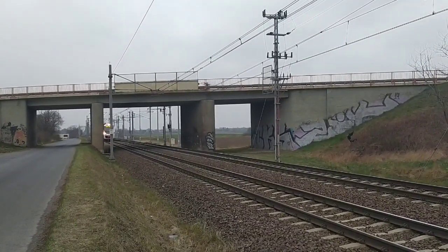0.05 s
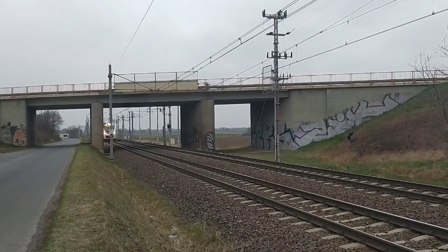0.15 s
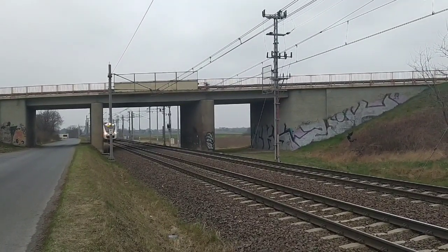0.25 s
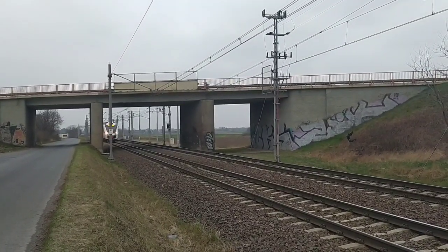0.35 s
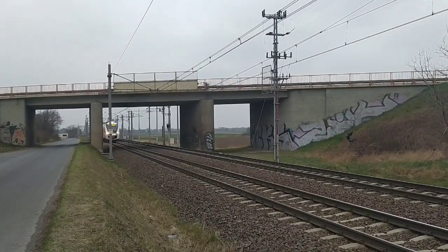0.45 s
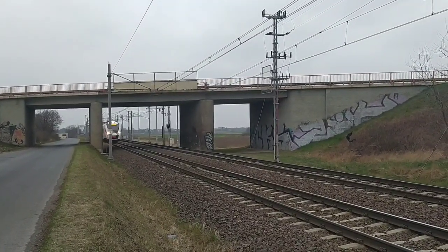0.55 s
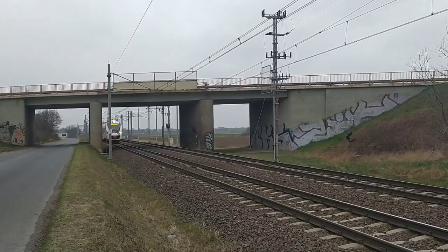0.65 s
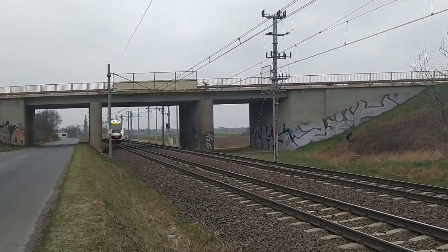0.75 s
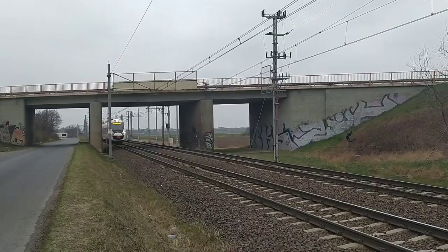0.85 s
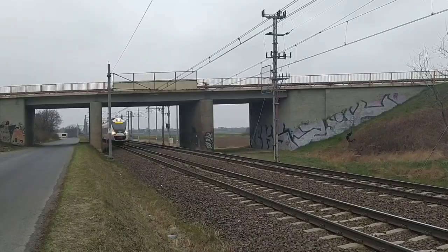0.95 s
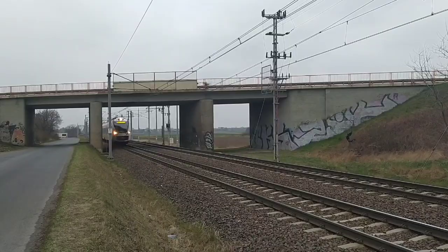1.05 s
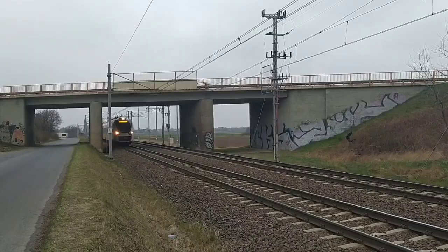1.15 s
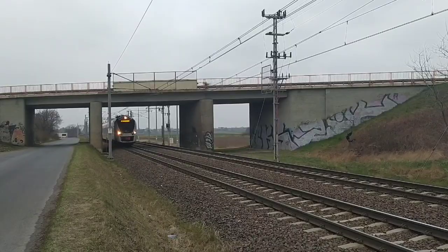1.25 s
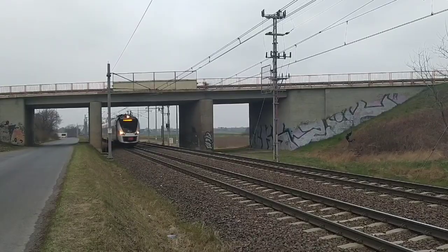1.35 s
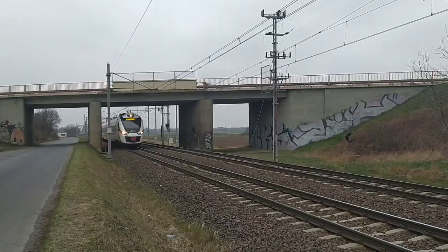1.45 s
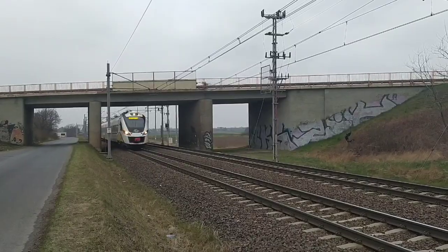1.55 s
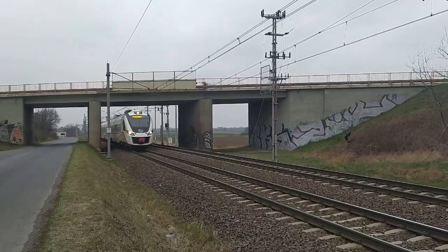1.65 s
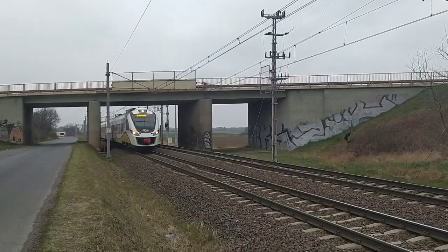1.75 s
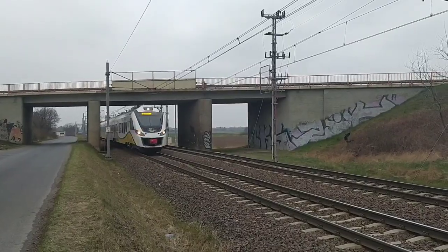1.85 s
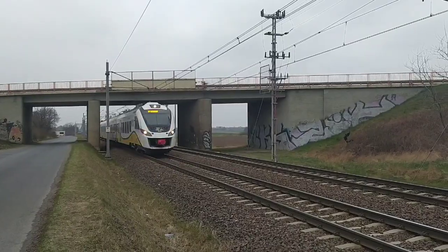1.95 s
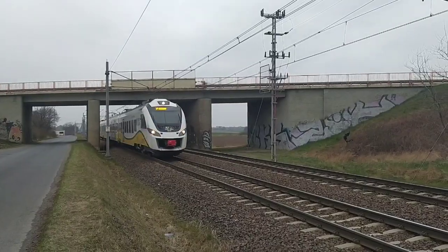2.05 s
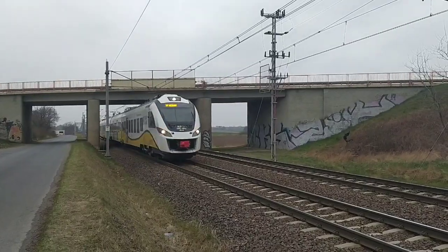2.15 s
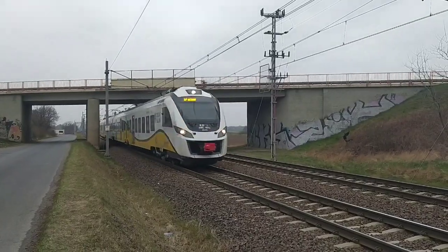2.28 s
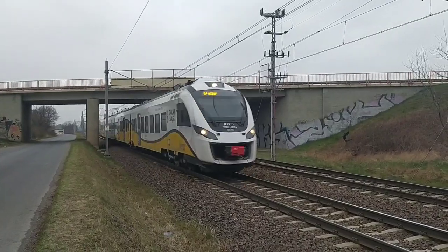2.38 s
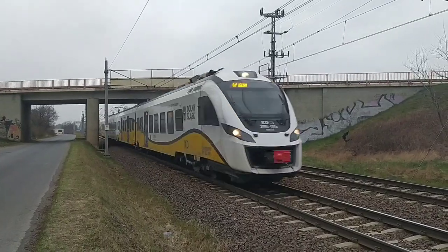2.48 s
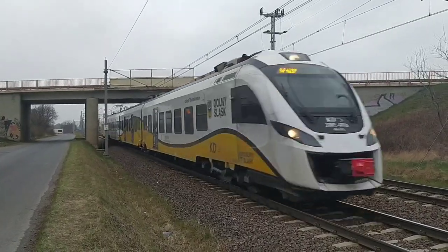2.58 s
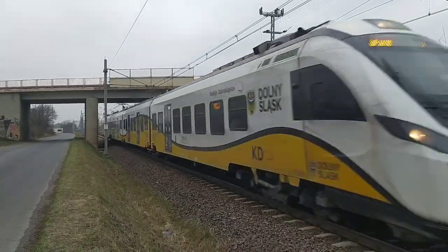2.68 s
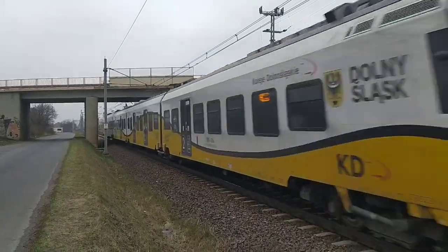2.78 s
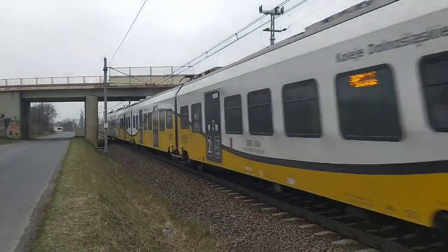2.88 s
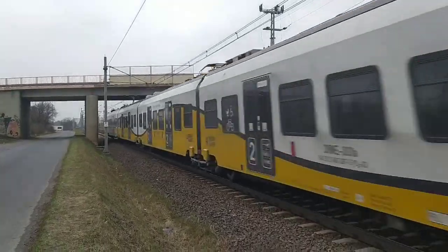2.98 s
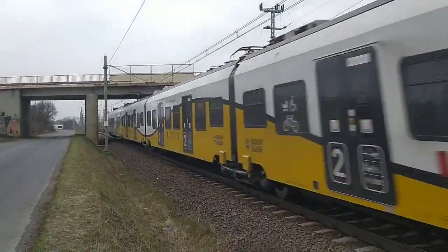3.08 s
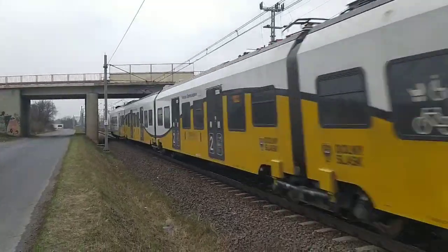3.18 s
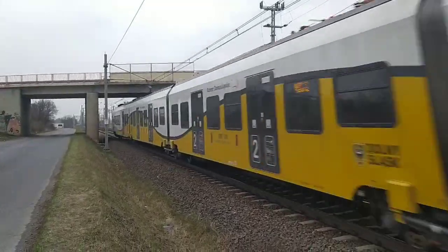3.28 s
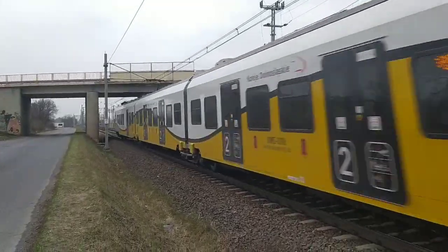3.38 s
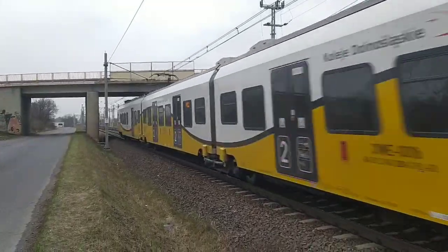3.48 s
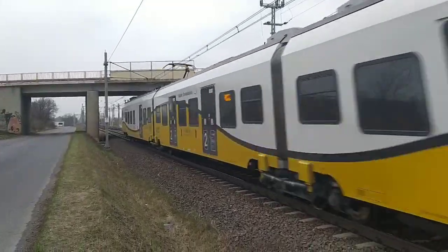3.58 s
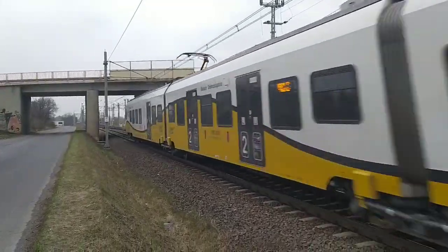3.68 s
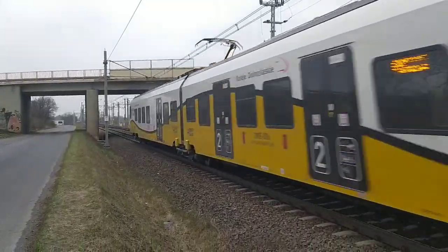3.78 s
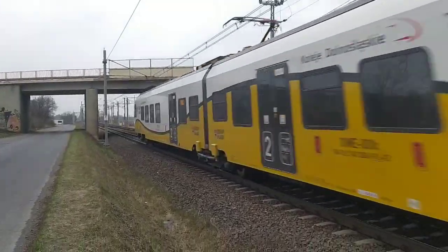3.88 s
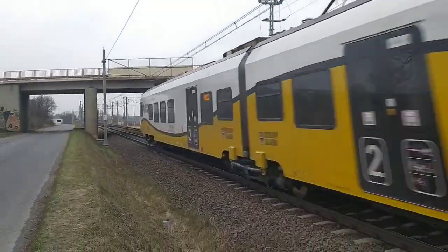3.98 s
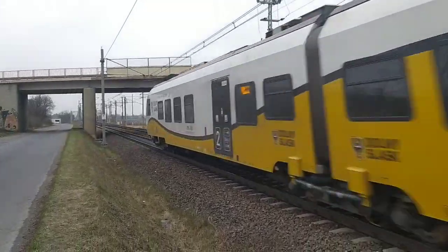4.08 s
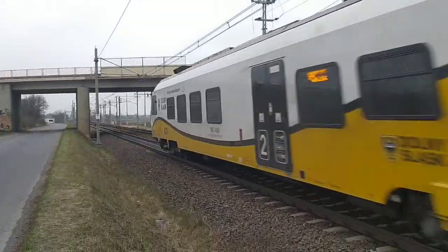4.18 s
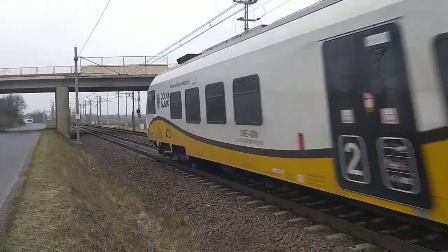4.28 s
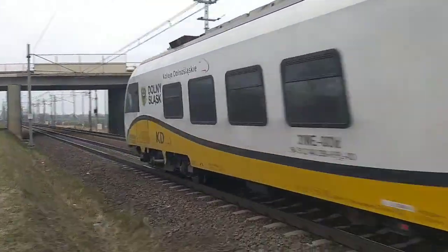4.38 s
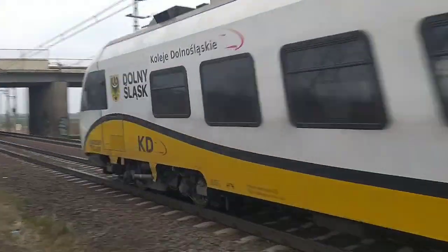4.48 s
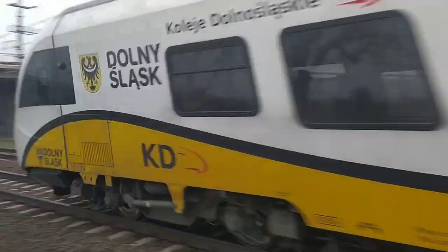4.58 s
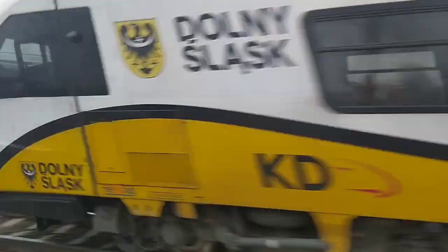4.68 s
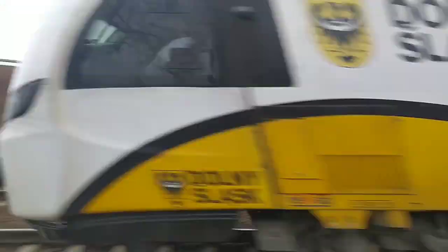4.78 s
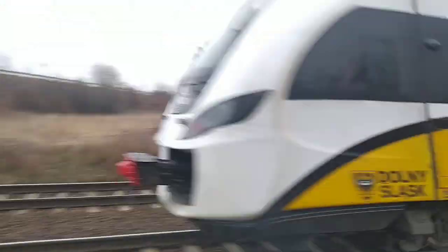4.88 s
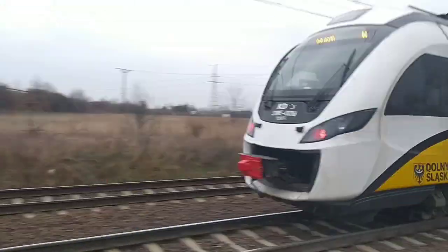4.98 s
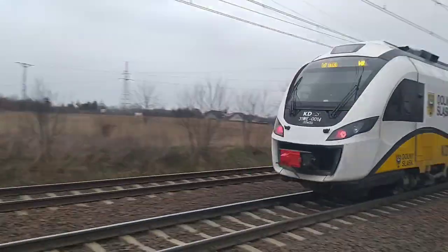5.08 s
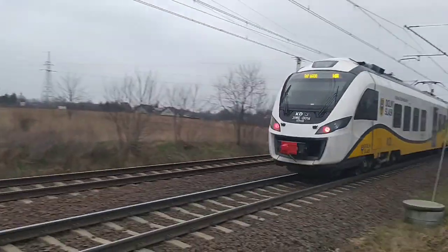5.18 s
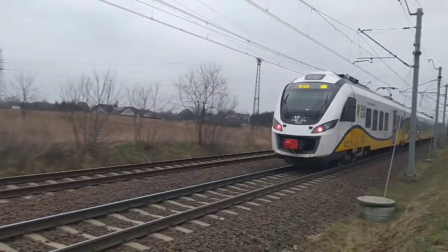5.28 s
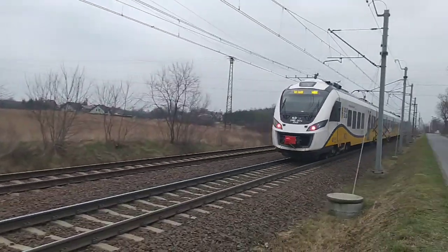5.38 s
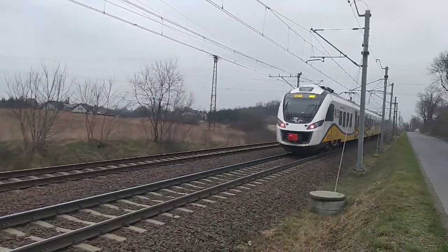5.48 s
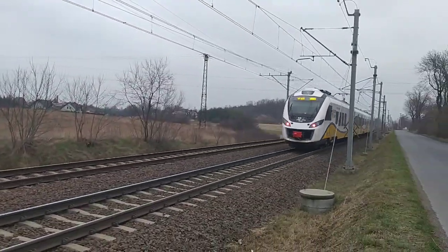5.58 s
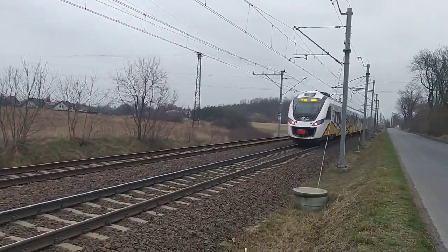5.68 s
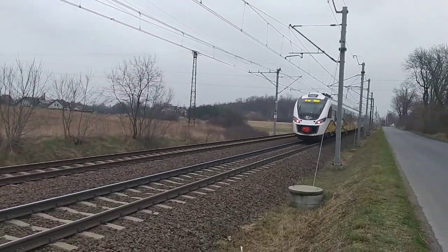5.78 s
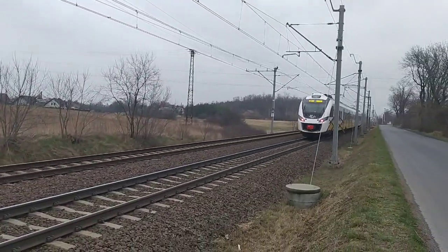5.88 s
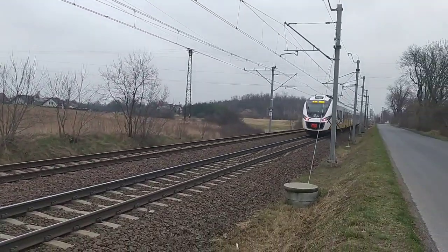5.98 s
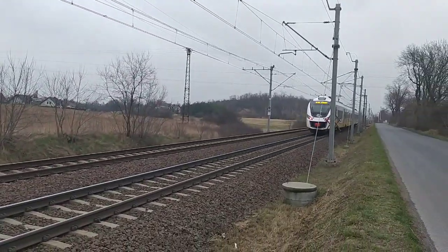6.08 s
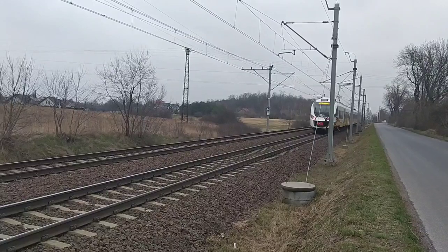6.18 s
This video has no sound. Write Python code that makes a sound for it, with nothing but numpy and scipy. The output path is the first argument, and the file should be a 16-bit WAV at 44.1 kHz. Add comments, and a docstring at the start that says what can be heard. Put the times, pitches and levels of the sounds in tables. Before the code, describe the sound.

A fast electric train passes at close range, its wheels rumbling, thumping and hissing, then fades into low, gusty wind on the microphone.

```python
"""An electric train runs under a road bridge and past at speed, a few metres from a hand-held phone.
The rails sing ahead of it and the nose shoves air aside. Then bogies rumble, uneven treads thump,
rough wheels and rails roar, and steel contact and air hiss. The ring of the last bogie falls in pitch
as it goes by, and the wake buffets the two closely spaced microphone ports."""
import sys
import numpy as np
from scipy import signal
from scipy.fft import rfft, irfft
from scipy.io import wavfile
from scipy.ndimage import uniform_filter1d, minimum_filter1d

SR = 44100
rng = np.random.default_rng(int(sys.argv[2]) if len(sys.argv) > 2 else 0)


def log_audio(samples):
    """Write samples as a 16-bit WAV file to the path given in sys.argv[1]."""
    # one column per channel
    frames = np.atleast_2d(samples).T
    # limit to full scale, then quantise
    limited = np.clip(frames, -1, 1)
    pcm = np.round(limited * 32767).astype(np.int16)
    wavfile.write(sys.argv[1], SR, pcm)


N = 275434
TIME, BIN_HZ = np.arange(N) / SR, np.arange(N // 2 + 1) * SR / N
SPEED_M_S, SOUND_M_S = 38.46, 343

# The bogies. Each row: time abreast of the microphone in seconds, low roar, rolling noise and hiss
# in relative dB, whine pitch in Hz, whine in relative dB.
BOGIES = [(2.88, 1.4, -0.53, -4, 2344, -28.5), (3.4, -2.5, 0, -3, 2235, -36),
          (3.871, -4.5, -0.8, -2.5, 2260, -47), (4.32, -1, -0.55, -1.3, 2383, -25.5),
          (4.79, -1.95, -0.5, 2, 2110, -26.5)]


def undb(db):
    """Decibels to gain."""
    return 10 ** (np.asarray(db) / 20)


def curves(table):
    """The columns of a time table, one value a sample."""
    s, *columns = np.transpose(table)
    return [np.interp(TIME, s, c) for c in columns]


def by_pitch(table):
    """The columns of a frequency table, one value a spectral bin."""
    hz, *columns = np.transpose(table)
    return [np.interp(np.log(np.maximum(BIN_HZ, 1)), np.log(hz), c) for c in columns]


def walk(rate):
    """Random levels held 1 / rate seconds and smoothed twice; spread 1."""
    hold = max(int(SR / rate), 1)
    steps = np.repeat(rng.standard_normal(N // hold + 1), hold)
    smooth = uniform_filter1d(uniform_filter1d(steps, hold), hold)[:N]
    return smooth / smooth.std()


def hump(s, width_s):
    """A smooth bell around time s, peak 1."""
    return np.exp(-np.minimum(((TIME - s) / width_s) ** 2, 50))


def swell(start, length):
    """A quick rise and slower fall, peak 1, mostly over after the given length."""
    u = np.maximum(TIME - start, 0) * 4 / length
    return (u * np.exp(1 - u)) ** 2


def pan(db):
    """Left and right gains for a level difference."""
    gains = undb(np.array([db, -db]).reshape(2, -1) / 2)
    return gains / gains.mean(axis=0)


def roar(tone):
    """Stereo noise of the given spectrum as the two ports take it in; the mid has rms 1."""
    # The microphone pair. Each row: frequency in Hz, side minus mid in dB, left minus right in dB.
    ports = [(60, -9, 2.5), (253, -10, 4.5), (420, -8, 5), (600, -8, 0.5), (900, -7.5, 5.5),
             (1210, -1.5, 0.5), (1540, 8, 0.5), (1930, -1, -4), (2340, -3.5, 0), (3100, 0, 2.5),
             (3720, 1, -3), (6000, -0.5, -3), (7040, -10.5, -2.2), (9500, -4.8, -9), (11100, -4, 2)]
    hz = np.maximum(BIN_HZ, 1)
    octaves_outside = np.abs(np.log2(hz / np.clip(hz, tone[0][0], tone[-1][0])))
    gain = undb(by_pitch(tone)[0] - 40 * octaves_outside)
    side_db, balance_db = by_pitch(ports)
    width, power_ratio = undb(side_db), undb(balance_db) ** 2
    # the part of the side that is in step with the mid leans the sound to one port
    lean = np.clip((power_ratio - 1) / (power_ratio + 1) * (1 + width ** 2) / (2 * width), -1, 1)
    common, diffuse = rfft(rng.standard_normal((2, N))) * gain
    mid = irfft(common, N)
    side = irfft(width * (lean * common + np.sqrt(1 - lean ** 2) * diffuse), N)
    return np.array([mid + side, mid - side]) / mid.std()


def resonance(hz, width_hz):
    """A mode shaken by random roughness; its centre may glide. Rms 1."""
    lowpass = signal.butter(2, width_hz / 2, fs=SR, output="sos")
    real, imag = signal.sosfilt(lowpass, rng.standard_normal((2, N)))
    phase = 2 * np.pi * np.cumsum(hz * np.ones(N)) / SR
    mode = real * np.cos(phase) + imag * np.sin(phase)
    return mode / mode.std()


def blow(noise, s, length, db):
    """One short burst of a ringing part, with a set strength."""
    first = int(s * SR)
    u = np.arange(min(int(3 * length * SR), N - first)) / SR * 4 / length
    shape = (u * np.exp(1 - u)) ** 2
    burst = noise[:, first:first + len(u)] * shape
    burst = burst * undb(db) * np.sqrt(np.sum(shape ** 2) / np.sum(burst.mean(axis=0) ** 2))
    return np.pad(burst, ((0, 0), (first, N - first - len(u))))


def along(s):
    """Metres travelled since being abreast of the microphone at time s; negative while approaching."""
    return SPEED_M_S * (TIME - s)


def distance():
    """Metres of track to the nearer end of the train, 0 while it is alongside."""
    return np.maximum(-along(BOGIES[0][0]), 0) + np.maximum(along(BOGIES[-1][0]), 0)


def nearness(near_m=15):
    """Close to 0 while the train is far, close to 1 while it is alongside."""
    return 0.067 + 0.86 / (1 + (distance() / near_m) ** 3)


def passed():
    """Share of the train that has gone by, 0 to 1."""
    return curves([(BOGIES[0][0], 0), (BOGIES[-1][0], 1)])[0]


def doppler(s, glide_m):
    """Pitch ratio of a source abreast at time s; it falls mostly within glide_m either side."""
    metres = along(s)
    return 1 / (1 + SPEED_M_S / SOUND_M_S * metres / np.hypot(metres, glide_m))


def falloff(s, reach_m, ahead_db, behind_db):
    """Level in dB of a source abreast at time s; it loses ahead_db or behind_db per tenfold distance."""
    metres = along(s)
    return -np.where(metres < 0, ahead_db, behind_db) * np.log10(np.hypot(metres, reach_m) / reach_m)


def passing(column, db, reach_m, ahead_db, behind_db, air_m):
    """Level in dB of one noise summed over the bogies; the air fades it by 1/e every air_m."""
    k = ("s", "roar", "rolling", "hiss").index(column)
    power = 0
    for bogie in BOGIES:
        gain = undb(bogie[k] + falloff(bogie[0], reach_m, ahead_db, behind_db))
        power += (gain * np.exp(-np.abs(along(bogie[0])) / air_m)) ** 2
    return db + 10 * np.log10(power)


def swells_db(column):
    """One part of the noise swells and dips briefly."""
    # Each row: peak time and half width in seconds, then rumble, rails and treble in dB.
    swells = [(1.0, 0.5, 2.5, 1.5, 2.1), (1.65, 0.36, 3, 1, 3), (2.3, 0.31, 2.5, 3.3, 1.5),
              (2.72, 0.11, -2, 5.5, 0), (2.835, 0.042, 7, 2.5, 0.5), (3.14, 0.073, 5, -4.5, -4),
              (4.08, 0.1, -3, 0.5, -0.5), (6.06, 0.037, 4, 4, -4)]
    k = ("s", "width", "rumble", "rails", "treble").index(column)
    return sum(row[k] * hump(row[0], row[1]) for row in swells)


def approach(ahead, near, behind):
    """Sound grazing the ballast loses its middle; close by it is whole; it leaves in another colour."""
    share, gone = nearness(), passed()
    far = np.sqrt(1 - gone) * roar(ahead) + np.sqrt(gone) * roar(behind)
    return np.sqrt(1 - share) * far + np.sqrt(share) * roar(near)


def ripple(sound, depth_db, size=2048):
    """Neighbouring pitches of the rail and wheel noise waver separately, at random."""
    spectra = signal.stft(sound, nperseg=size)[2]
    field = rng.standard_normal(spectra.shape[1:])
    for _ in range(2):
        field = uniform_filter1d(uniform_filter1d(field, size=3, axis=0), size=5, axis=1)
    gain = undb(depth_db * field / field.std())
    return signal.istft(spectra * gain / np.sqrt(np.mean(gain ** 2)), nperseg=size)[1][:, :N]


def bearing(sound):
    """From far along the line, the train's low roar reaches the right port first."""
    # Each row: frequency in Hz, lag of the left port in radians.
    far_lag = [(170, 0.47), (500, 0.83), (850, 0.72), (1100, 0)]
    lag, = by_pitch(far_lag)
    oblique = irfft(rfft(sound) * np.exp(.5j * np.array([-lag, lag])), N)
    share = nearness()
    return share * sound + (1 - share) * oblique


def buffets(port_hz=190, knee_hz=420, slope=2.9, rise_s=0.006, boom_hz=300, boom_width_hz=70, boom_db=4):
    """Each eddy strikes one microphone port with turbulent pressure; harder ones tend to reach higher."""
    # Each row: start and length in seconds, level in dB, upper edge in Hz, port (0 left, 1 right).
    eddies = [(0.021, 0.047, -34.5, 292, 1), (0.323, 0.05, -40, 220, 0), (0.572, 0.025, -34, 220, 0),
              (0.637, 0.036, -26.5, 252, 1), (1.101, 0.14, -33.5, 278, 1), (5.594, 0.01, -13, 398, 1),
              (5.626, 0.0077, -7, 746, 1), (5.633, 0.023, -12.5, 207, 1), (5.756, 0.052, -22, 90, 0),
              (5.905, 0.0081, -3, 685, 1), (5.964, 0.01, -2, 475, 1), (5.982, 0.021, -8.5, 1100, 1),
              (5.997, 0.0041, 2.5, 3280, 1), (6.011, 0.011, -9, 1710, 1), (6.025, 0.022, -17, 900, 1),
              (6.043, 0.01, -10, 1100, 1), (6.058, 0.048, -15, 260, 0), (6.124, 0.018, -10.5, 700, 1),
              (6.19, 0.014, -7.5, 480, 1), (6.219, 0.03, -9.5, 704, 1)]
    turbulence = rfft(rng.standard_normal(N)) * BIN_HZ ** 2 / (BIN_HZ ** 2 + port_hz ** 2)
    turbulence /= np.sqrt(1 + (BIN_HZ / knee_hz) ** 2)
    turbulence *= undb(boom_db / (1 + ((BIN_HZ - boom_hz) / boom_width_hz) ** 2))
    out = np.zeros((2, N))
    for s, length, db, edge_hz, port in eddies:
        shape = np.clip((TIME - s) / rise_s, 0, 1) ** 2 * hump(s, length)
        burst = shape * irfft(turbulence / np.sqrt(1 + (BIN_HZ / edge_hz) ** (2 * slope)), N)
        out[port] += undb(db) * burst * np.sqrt(np.sum(shape ** 2) / (np.sum(burst ** 2) + 1e-18))
    return out


def wake(full_s=6.12, rise_db_per_s=35, full_db=-23):
    """Air dragged behind the train builds up, then holds, rumbling on each port separately."""
    # Each row: frequency in Hz, relative level in dB.
    tone = [(8, 0), (22, 11.5), (60, -4), (110, 1.5), (250, -11), (500, -11), (1500, -58), (6000, -120)]
    air = irfft(rfft(rng.standard_normal((2, N))) * undb(by_pitch(tone)[0]), N)
    build_db = rise_db_per_s * np.minimum(TIME - full_s, 0)
    return air / air.std() * undb(full_db + build_db + 1.8 * walk(25))


def rail_song(fade_m=87, behind_db=-2.5):
    """The rails carry a few narrow bands far along the line and ring on behind the train."""
    # High waves running in the rails. Each row: frequency in Hz, relative level in dB.
    song_tone = [(5500, -26), (5850, 3), (6050, -34), (6400, -33), (6600, 7.5), (6850, 12), (7250, 5.5),
                 (7650, 3), (7850, -21), (8200, -18), (8600, -10), (9300, 9), (9480, 1), (9620, 9.5),
                 (9780, -2), (10000, -15), (10500, -6), (11100, -8), (12000, -19)]
    # The rail's resonance between sleepers. Each row: time in seconds, level in dB.
    span_levels = [(0, -51), (1.5, -44), (2.5, -42), (4.7, -54), (5.2, -31.5), (5.8, -34.5), (6.25, -37)]
    song = roar(song_tone) * np.exp(-distance() / fade_m)
    song *= undb(-38 + behind_db * passed() + 1.3 * walk(4.6))
    span = np.array([resonance(1305, width_hz=166), resonance(1290, width_hz=220)])
    leftward_db, = curves([(2, 0), (5, 16)])
    trail = resonance(964, width_hz=170) * pan(10) * undb(-31) * hump(5.12, width_s=0.4)
    return song + trail + span * pan(leftward_db) * undb(curves(span_levels)[0])


def bow_wave():
    """The nose drives a deep wave of air ahead of it."""
    # Each row: frequency in Hz, relative level in dB.
    tone = [(20, 6), (28, 8), (42, 0), (60, 5), (100, 1), (150, 2), (220, -8)]
    return roar(tone) * undb(-23.5) * hump(2.78, width_s=0.29)


def shoves():
    """Air pushed aside by the nose, the gaps between cars and the tail arrives in low shoves."""
    # Each row: start and length in seconds, level in dB.
    pushes = [(2.761, 0.077, -16), (3.407, 0.085, -20), (4.13, 0.1, -21), (4.245, 0.17, -20.5),
              (4.99, 0.42, -29)]
    push = sum(undb(db) * swell(s, length) for s, length, db in pushes)
    return roar([(20, -13), (50, -10), (95, -6), (175, 9.5), (290, 5), (450, -18)]) * push


def hiss():
    """Steel contact and rushing air hiss; the flanges scrape twice."""
    # The hiss and the sizzle above it. Each row: frequency in Hz, relative level in dB.
    hiss_tone = [(2900, -17), (3700, -5), (4400, 0), (5200, 3), (6000, 3.5), (7000, 3), (7700, 2),
                 (8800, -42)]
    sizzle_tone = [(6000, -32), (7200, -4), (8000, 0.5), (8750, 5), (9400, 1), (10200, -7.5), (11000, -16),
                   (12000, -21.5), (14500, -42)]
    # Each row: start and length in seconds, relative level in dB.
    scrapes = [(2.858, 0.049, -24), (2.94, 0.034, -22)]
    flutter_db = 0.95 * walk(70) + swells_db("treble")
    scrape = sum(undb(db) * swell(s, length) for s, length, db in scrapes)
    hiss_db = passing("hiss", db=-23.5, reach_m=8.5, ahead_db=23, behind_db=24.5, air_m=66.5)
    sizzle_db = passing("hiss", db=-22, reach_m=8, ahead_db=19, behind_db=15, air_m=66.5)
    low = roar(hiss_tone) * (undb(hiss_db + flutter_db) + 0.11 * scrape)
    high = roar(sizzle_tone) * pan(-0.47) * (undb(sizzle_db + flutter_db) + 0.72 * scrape)
    return low + high


def wheel_modes(ring_s=4.68):
    """Wheel modes whine and slide down as each bogie passes; the last one also rings lower."""
    # The last bogie's close modes. Each row: frequency and width in Hz, level in dB.
    modes = [(994, 103, -20), (1067, 47, -21)]
    glide = doppler(ring_s, glide_m=22)
    ring = sum(undb(db) * resonance(hz * glide, width_hz) for hz, width_hz, db in modes)
    ring_db = falloff(ring_s, reach_m=6.5, ahead_db=44, behind_db=36) - walk(45)
    out = ring * pan(9.5) * undb(ring_db)
    for s, _, _, _, whine_hz, whine_db in BOGIES:
        hz = whine_hz * doppler(s, glide_m=6)
        shared = resonance(hz, width_hz=390)
        whine = np.array([0.9 * shared + 1.15 * resonance(hz, width_hz=190) for _ in range(2)])
        out += whine * undb(whine_db + falloff(s, reach_m=6.6, ahead_db=57, behind_db=39.6))
    return out


def thumps():
    """The leading wheels clatter: each blow of an uneven tread thuds in the bogie and clangs in the rail."""
    # Each row: start and length in seconds, thud in dB, clang in dB.
    blows = [(2.401, 0.013, -31, -15.5), (2.59, 0.03, -24, -17.5), (2.664, 0.028, -19.5, -17),
             (2.726, 0.037, -17.5, -14.5), (2.751, 0.029, -25, -18), (2.772, 0.037, -19, -25),
             (2.789, 0.037, -25, -20), (2.817, 0.037, -19, -23), (2.851, 0.039, -18.5, -16),
             (2.885, .036, -16.5, -21), (2.928, 0.023, -16, -17), (2.956, 0.04, -13.5, -15.5),
             (3, 0.027, -14.5, -18), (3.022, .04, -18, -16.5), (3.071, 0.055, -14.5, -16),
             (3.105, 0.025, -14, -13.5), (3.142, 0.052, -17, -18), (3.175, 0.032, -19, -22),
             (3.234, 0.035, -24, -19), (3.251, 0.043, -18, -21), (3.297, 0.039, -24, -20),
             (3.319, 0.028, -25, -21), (3.332, 0.04, -17, -30), (3.386, 0.055, -17.5, -19.5),
             (3.479, 0.058, -24, -20)]
    # The struck bogie and rail. Each row: frequency in Hz, relative level in dB.
    thud_tone = [(120, -12), (200, -2.5), (290, -1), (400, -10), (520, -1), (650, -41)]
    clang_tone = [(420, -6), (560, -9), (680, -2), (820, 2.5), (1050, -3), (1250, -17), (1700, -14),
                  (2400, -14.5), (3600, -28.5)]
    thud, clang = roar(thud_tone), roar(clang_tone)
    return sum(blow(thud, s, length, thud_db) + blow(clang, s, length, clang_db)
               for s, length, thud_db, clang_db in blows)


def rolling():
    """Roughness of wheel and rail shakes both together."""
    # The rails, then the wheels coming, alongside and going. Each row: frequency in Hz, relative dB.
    rail_tone = [(480, -29), (650, -8.5), (790, 1), (900, 1.5), (1070, 1), (1170, -3), (1350, -15.5),
                 (1700, -23.5)]
    wheel_ahead = [(1100, -41), (1380, -5), (1620, -9.5), (2000, 5.5), (2350, -1), (2750, -5.5),
                   (3120, -1.5), (3550, -17.5), (4300, -44)]
    wheel_near = [(790, -32), (1350, -3), (1720, -4.5), (2330, 2), (2750, -5), (3250, -11), (3700, -16),
                  (4810, -69)]
    wheel_behind = [(1100, -37), (1500, -4.5), (1800, 8), (2100, -3), (2350, 1.5), (2750, -2.5),
                    (3100, -7.5), (3550, -9), (4300, -25)]
    rough_db = 0.73 * walk(60)
    rail_db = passing("rolling", db=-22, reach_m=10.5, ahead_db=19.5, behind_db=22.5, air_m=125)
    wheel_db = passing("rolling", db=-22, reach_m=8, ahead_db=28, behind_db=27.5, air_m=190)
    rails = roar(rail_tone) * undb(rail_db + swells_db("rails"))
    wheels = approach(wheel_ahead, wheel_near, wheel_behind) * undb(wheel_db + 1.1 * swells_db("treble"))
    return (rails + wheels) * undb(rough_db)


def running_gear():
    """Car bodies rumble; bogies and sleepers roar unevenly."""
    # Both as heard down the line and from a few metres. Each row: frequency in Hz, relative level in dB.
    body_far = [(14, 3.5), (28, 4.5), (48, 0), (65, 1), (95, -10.5), (130, -17), (190, -3)]
    body_near = [(14, -21), (22, 5.5), (28, 0.5), (37, -3), (52, 5.5), (70, -2.5), (100, -2.5), (130, -9),
                 (190, -11)]
    bogie_ahead = [(70, -46), (120, -6), (175, -3.5), (255, -5.5), (360, -17), (550, -21.5), (660, -23),
                   (850, -50)]
    bogie_near = [(76, -47), (130, -11.5), (183, 2.5), (253, 0.5), (420, -4), (507, -5.5), (588, -8),
                  (650, -5), (840, -20), (1430, -120)]
    bogie_behind = [(70, -50), (125, -11.5), (190, 1.5), (270, -5.5), (370, -7.5), (500, -10), (640, -19),
                    (850, -48)]
    body_db = passing("roar", db=-32.5, reach_m=14.5, ahead_db=12.5, behind_db=13.5, air_m=300)
    bogie_db = passing("roar", db=-21, reach_m=8, ahead_db=22.5, behind_db=21, air_m=500)
    bodies = approach(body_far, body_near, body_far) * undb(body_db + swells_db("rumble"))
    bogies = approach(bogie_ahead, bogie_near, bogie_behind) * undb(bogie_db + 0.7 * walk(45))
    return bodies + bogies


def scene():
    """Wind, rails and train as they reach the microphone at the lineside."""
    wind = wake() * pan(1.6) + buffets()
    steel = ripple(rolling() + hiss() + rail_song(), depth_db=2.0)
    return bearing(running_gear() + steel) + wheel_modes() + thumps() + bow_wave() + shoves() + wind


def record(dry, ceiling=0.97, window_s=0.004, top_hz=14800):
    """The phone's limiter ducks smoothly around peaks near full scale; the top is cut."""
    size = int(window_s * SR)
    needed_gain = ceiling / np.maximum(np.abs(dry).max(axis=0), ceiling)
    gain = uniform_filter1d(minimum_filter1d(needed_gain, size), size)
    return signal.sosfilt(signal.ellip(8, .2, 80, top_hz, fs=SR, output="sos"), dry * gain)


dry = scene()
out = record(dry)
log_audio(out)
```